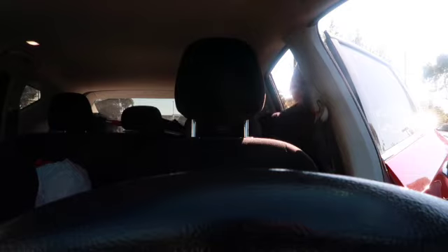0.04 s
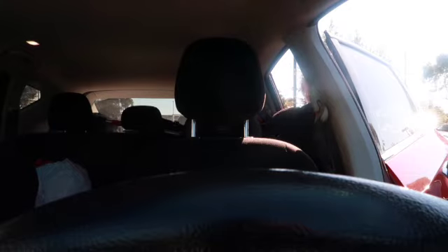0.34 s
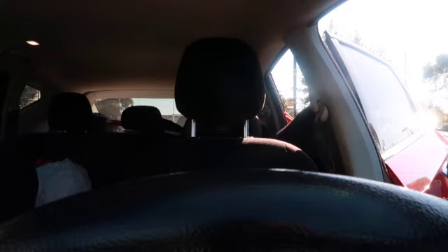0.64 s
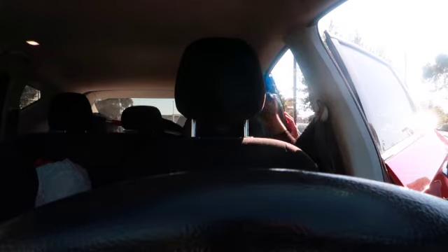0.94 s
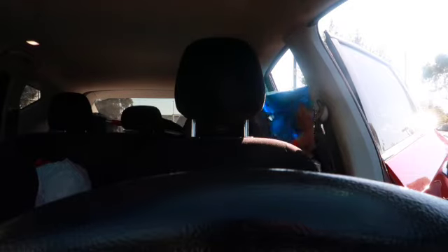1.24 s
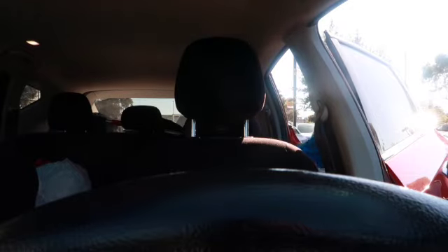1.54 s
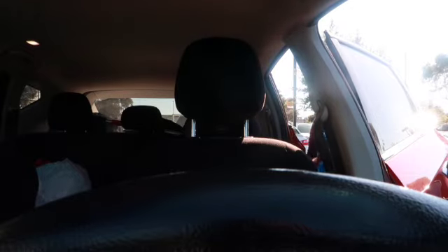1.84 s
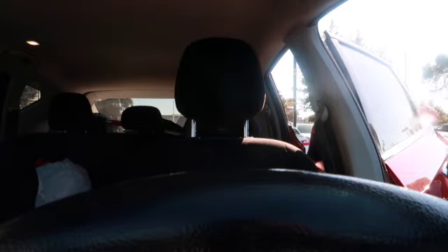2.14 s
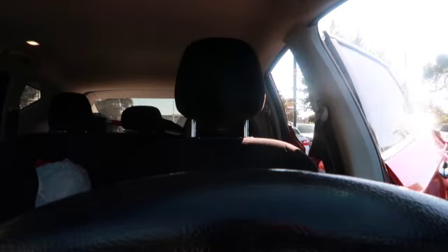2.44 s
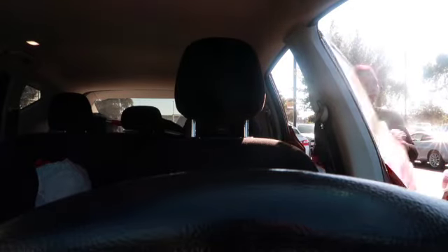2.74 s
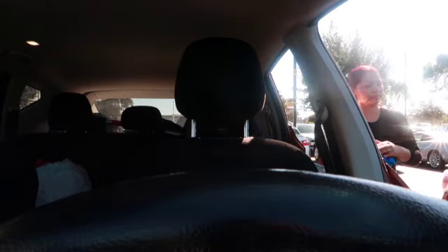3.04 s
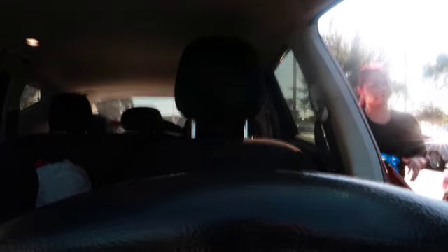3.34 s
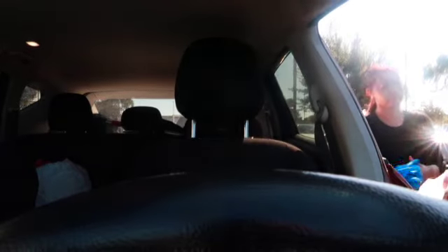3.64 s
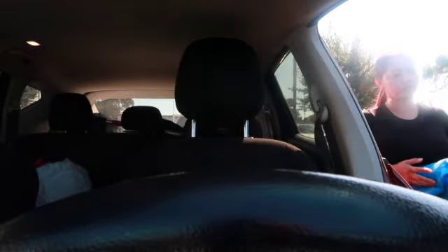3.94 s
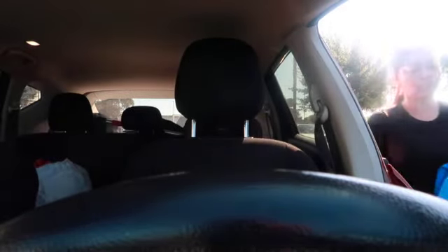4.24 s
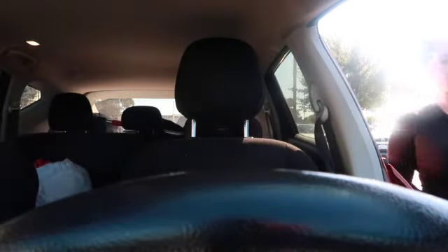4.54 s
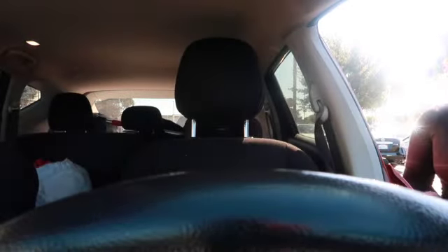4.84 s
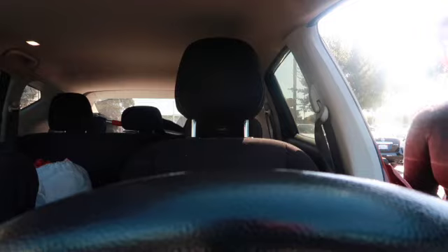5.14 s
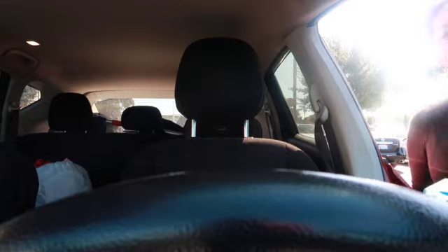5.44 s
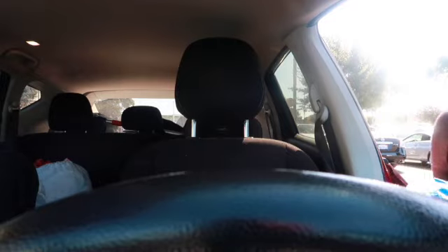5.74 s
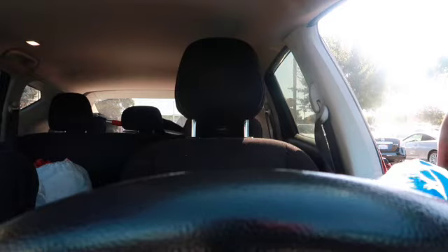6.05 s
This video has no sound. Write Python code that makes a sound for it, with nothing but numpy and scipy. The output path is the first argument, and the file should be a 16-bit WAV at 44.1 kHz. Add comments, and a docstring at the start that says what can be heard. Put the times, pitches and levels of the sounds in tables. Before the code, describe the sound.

The sound is heard from the dashboard of a parked car, with distant traffic humming through an open rear door. For the first two seconds, cloth and a bag rustle faintly, with a few soft bumps and two light knocks on plastic around 1 second. From 2 seconds, someone shuffles and thuds softly against the seat and bodywork, and a metal part of the door clicks sharply at 2.3 seconds. At 3.3 seconds the door slams, by far the loudest sound: a latch clack, a solid thump and a short boom in the cabin. The background then turns duller and quieter. From about 4 seconds to the end, small bits of metal clink lightly and clothing brushes faintly along the door. Outside, a car moves off with a muffled rumble and soft tyre noise from 4.5 seconds, its low engine note swelling and rising slightly from 5.3 to 6 seconds.

```python
"""Car door slam from inside

Parked on a car park, stereo microphone on the dashboard, a rear door open to distant traffic. Someone
rustles and bumps about at the door, its hardware clicks, then it is slammed: the latch chatters, the
panel hits the frame, the cabin booms. The recorder's gain ducks and creeps back while clothes rustle,
bits of metal clink and an engine outside begins to pull away."""
import sys
import numpy as np
from scipy import signal
from scipy.fft import rfft, irfft, next_fast_len
from scipy.io import wavfile
from scipy.ndimage import uniform_filter1d, minimum_filter1d

SR = 44100
rng = np.random.default_rng(int(sys.argv[2]) if len(sys.argv) > 2 else 0)


def to_wav(sig):
    """Store sig (one row per channel, or 1-D mono) as 16-bit WAV at the path in sys.argv[1].

    Samples outside -1..1 are clipped; the rate is SR.
    """
    pcm = np.clip(np.atleast_2d(sig), -1, 1) * 32767
    pcm = np.round(pcm).astype(np.int16)
    wavfile.write(sys.argv[1], SR, pcm.T)  # frames by channels


N = 268657
T = np.arange(N) / SR
RING_T = T[:SR]  # the second that follows a blow

# the latch rides over the striker and locks: start_s, level_db, grit_cutoff_hz
LATCH_STRIKES = [(3.2782, -21, 1200), (3.2809, -12.5, 2390), (3.284, -8, 1800), (3.2868, -18, 1800),
                 (3.2934, -5.5, 2400), (3.3002, 0, 5000), (3.3044, 0.5, 8500)]
# low rumble of the exhaust and of the shuddering body: frequency_hz, density_db
RUMBLE_SPECTRUM = [(20, -20), (45, -3), (70, 2), (95, -5.5), (140, -18), (250, -15), (400, -33.5),
                   (1000, -52), (8000, -110)]
# soft contact with seat and bodywork: frequency_hz, density_db
PADDING_SPECTRUM = [(30, -16), (70, -1.5), (115, 3.5), (250, -2.5), (380, -9.5), (550, -23), (1500, -66),
                    (8000, -110)]


def door_slam():
    """The latch chatters until the seal muffles it; the panel lands and rebounds, pumping the cabin air."""
    # ringing of latch, door skin and cabin air: pitch_hz, level_db, t60_s
    latch_modes = [(399, 2, .07), (470, -1.5, .059), (660, -6.5, 0.066), (845, -2.5, .06), (956, -0.5, .05),
                   (1042, -6.5, 0.08), (1210, -20, 0.051), (1480, -15.5, .09), (1791, -11, .1),
                   (2440, -14, .083), (2827, -20, 0.1), (4070, -29, .09), (5270, -23, 0.076)]
    skin_modes = [(229, 0.5, 0.054), (290, 3, .045), (326, -12, 0.16), (400, -3.5, .04), (551, -13, 0.058),
                  (645, -3, 0.034), (753, -29, .047)]
    cabin_modes = [(26.7, -15, 0.63), (48.7, -7.5, 0.46), (63.3, -4.5, .28), (87.2, -9.5, 0.26),
                   (116, 1, 0.23), (149.7, -11.5, 0.27), (194, -10, 0.25), (253.2, -7.5, 0.16)]
    # noise of the struck parts: frequency_hz, density_db
    latch_spectrum = [(200, -24), (400, -8), (600, -8), (950, 3), (1450, -6), (2500, -7.5), (4000, -15.5),
                      (4600, -22), (5300, -18), (7000, -24), (10300, -26), (15000, -33)]
    panel_spectrum = [(60, -17), (270, 9.5), (450, 5.5), (780, -1.5), (1300, -12), (2600, -11.5),
                      (4000, -18.5), (5300, -25), (7500, -21), (10300, -18), (12000, -25), (15000, -26)]
    fittings_spectrum = [(400, -10), (800, -10), (1700, 3), (2700, -3.5), (4000, -13), (5300, -10.5),
                         (7000, -24), (10300, -21), (15000, -31)]
    # the door touches its seal, lands and rebounds: start_s, panel_db, boom_db, clap_cutoff_hz
    landings = [(3.2935, -9, -19, 3000), (3.3008, 8, 4, 4500), (3.3321, -0.5, -9, 2500),
                (3.359, -19, -12, 2000)]
    rattles = [(3.324, -18), (3.334, -22), (3.343, -24.5), (3.381, -30), (3.387, -36), (3.413, -41)]  # loose fittings inside the door: start_s, level_db
    latch, body = np.zeros((2, 2, N))
    catch = undb(-3) * push(latch_modes)
    skin = undb(-2.5) * push(skin_modes)
    boom = contact(0.021) * push(cabin_modes)
    for s, db, cutoff_hz in LATCH_STRIKES:
        grit = undb(-4.5) * dull(crack(latch_spectrum, t60=0.054, tail_db=-16, tail_t60=0.19), cutoff_hz)
        add(latch, s, undb(db) * contact(0.0067) * (catch + grit))
    for s, panel_db, boom_db, cutoff_hz in landings:
        clap = undb(-9) * dull(crack(panel_spectrum, t60=0.018, tail_db=-8.5, tail_t60=0.3), cutoff_hz)
        panel = undb(panel_db) * contact(0.0049) * (skin + clap)
        rumble = noise(RUMBLE_SPECTRUM, size=len(RING_T), apart_db=-10)
        shudder = undb(-15.5) * contact(0.033) * fade(0.5) * rumble
        add(body, s, panel + undb(boom_db) * (boom + shudder))
    for s, db in rattles:
        rattle = crack(fittings_spectrum, t60=0.051, tail_db=-14.5, tail_t60=0.088)
        add(body, s, undb(db) * contact(0.0026) * rattle)
    seal = undb(-7.5 * rise(start_s=3.307, length_s=0.008))  # the rubber closes on the latch's ringing
    return latch * seal + body


def door_click():
    """A sprung metal part in the open door snaps over and bounces."""
    snaps = [(2.3303, -15.5), (2.3317, -19), (2.3355, -24), (2.3405, -25.5), (2.3447, -30)]  # the snap and its bounces: start_s, level_db
    snap_spectrum = [(300, -40), (850, -5.5), (1450, -2.5), (1800, -9), (2400, 10.5), (2900, -1.5),
                     (3450, 2.5), (4000, -10), (4600, -8), (6800, -17), (9800, -16), (11200, -16),
                     (12500, -23), (14500, -17), (15400, -3), (16500, -40)]  # noise of the impact: frequency_hz, density_db
    hardware_modes = [(822, -19, .34), (1194, -17, .069), (1483, -4.5, .05), (1836, -21, .19),
                      (2274, -9, 0.11), (2370, -1, 0.055), (2490, -6, .08), (2700, -10, 0.14),
                      (3310, -6, .05), (3540, -11, 0.076), (4550, -13, .05), (6265, -24, 0.06),
                      (8240, -15, 0.053), (9760, -2.5, 0.015), (10700, -9, .04)]  # ringing metal: pitch_hz, level_db, t60_s
    out = np.zeros((2, N))
    for s, db in snaps:
        snap = crack(snap_spectrum, t60=0.026, tail_db=-12, tail_t60=0.16)
        ringing = undb(-2.5) * ring(hardware_modes, scatter_db=0)
        add(out, s, undb(db) * contact(0.0015) * (snap + ringing))
    return out


def rustling():
    """At the rear door, cloth, a bag and a shuffling body slide in tiny catches."""
    # sliding movements: middle_s, level_db, width_s
    cloth_strokes = [(.26, -53.5, 0.27), (0.486, -49.5, 0.042), (0.73, -54, 0.13), (0.92, -51, 0.085),
                     (1.02, -52, 0.14), (1.16, -55, 0.082), (1.6, -55.5, 0.25), (1.774, -49.5, 0.051),
                     (3.912, -56.5, 0.14), (4.1, -49, 0.066), (4.52, -53, 0.51), (5.18, -52.5, 0.34),
                     (5.324, -46.5, 0.065), (5.544, -56, 0.095), (5.858, -52.5, 0.08), (6.053, -54, 0.22)]
    bag_swishes = [(.7, -51, 0.055), (.94, -53.5, .1), (1.04, -53, 0.06), (1.17, -55, 0.055)]  # a slick bag going past
    sleeve_brushes = [(4.87, -53.5, 0.091), (5.19, -45.5, 0.2)]  # along the outside of the door
    shuffles = [(.53, -32.5, .075), (2.06, -34.5, 0.075), (2.17, -33, 0.095), (2.67, -33, 0.13),
                (3.11, -36, 0.1), (3.2, -34, 0.042)]  # against seat and bodywork
    # friction noise of each material: frequency_hz, density_db
    cloth_spectrum = [(500, 6), (1400, -14.5), (2600, 3.5), (3800, -1.5), (5400, -6.5), (7000, -12),
                      (10200, -9.5), (11500, -21.5), (15000, -19), (17000, -30)]
    bag_spectrum = [(1000, -25), (2800, 6.5), (4000, 0), (5100, 0), (6500, -21), (10200, -29), (15000, -25)]
    sleeve_spectrum = [(400, -12), (950, -1), (1250, -1), (1500, -2), (1850, -2), (2400, -1.5), (3400, -8),
                       (4500, -17), (5300, -7), (7000, -17), (10000, -23), (13000, -45)]
    cloth_motion = np.hypot(strokes(cloth_strokes), undb(-59))  # cloth never quite rests
    cloth = noise(cloth_spectrum, apart_db=-2.5) * cloth_motion * undb(2 * walk(45) + 1.8 * walk(600))
    bag = noise(bag_spectrum, apart_db=-18) * strokes(bag_swishes) * undb(2.3 * walk(330))
    sleeve = noise(sleeve_spectrum, apart_db=-8) * strokes(sleeve_brushes) * undb(1.7 * walk(80))
    seat = noise(PADDING_SPECTRUM, apart_db=13.5) * strokes(shuffles) * undb(2.6 * walk(70))
    return cloth + bag + sleeve + seat


def knocks_and_bumps():
    """Sharp knocks on plastic trim, and padded bumps that thud through the bodywork."""
    # blows on the trim and on the padding: start_s, level_db, t60_s
    trim_knocks = [(.994, -31, 0.025), (1.197, -32.5, 0.02), (4.987, -35, 0.019)]
    soft_bumps = [(.499, -29, .25), (.525, -25, 0.11), (0.616, -28.5, 0.12), (2.11, -20.5, 0.098),
                  (2.148, -23, 0.19), (2.335, -26, 0.11), (2.514, -23, 0.19), (2.623, -21.5, 0.23),
                  (2.652, -25.5, 0.27), (2.722, -28, .1), (2.755, -21.5, 0.088), (3.072, -23.5, 0.28),
                  (3.208, -20.5, 0.11), (4.08, -31, 1), (5.35, -31, 0.45)]
    trim_spectrum = [(700, -28), (1500, -3), (2250, 3), (2700, 1), (3200, -4), (4700, -24), (9000, -37),
                     (15000, -40)]  # struck plastic: frequency_hz, density_db
    out = np.zeros((2, N))
    for s, db, t60 in trim_knocks:
        add(out, s, undb(db) * contact(0.0042) * crack(trim_spectrum, t60, tail_db=-30, tail_t60=0.1))
    for s, db, t60 in soft_bumps:
        thud = noise(PADDING_SPECTRUM, size=len(RING_T), apart_db=15.5)
        add(out, s, undb(db) * contact(0.018) * fade(t60) * thud)
    return out


def clinks():
    """A bit of metal ticks and bounces once, ringing only briefly."""
    touches = [(3.56, -54, 5000), (4.085, -42, 3500), (4.277, -36.5, 5000), (4.321, -40.5, 3500),
               (4.449, -45.5, 4960), (4.46, -49, 4500), (4.987, -42, 5900), (5.357, -36.5, 3900),
               (5.481, -49, 5100), (5.526, -42, 5020), (5.593, -51, 3970), (5.817, -46, 4040)]  # light touches: start_s, level_db, favoured_hz
    trinket_modes = [(2760, -1, 0.083), (3320, -8, .06), (3940, 1, 0.064), (4100, -5, .06),
                     (5070, -3.5, 0.073), (5300, -3, 0.059), (5950, -6, 0.065), (7300, -15, .03)]  # ringing metal: pitch_hz, level_db, t60_s
    tick_spectrum = [(500, -6), (1400, -9), (2800, 3), (5400, 5), (7500, -7), (10500, -6), (15000, -2)]  # metal meeting metal: frequency_hz, density_db
    pitch_spread, fall_db_per_octave = 0.012, 13.5  # modes weaken away from the favoured pitch
    out = np.zeros((2, N))
    for (s, db, favoured_hz), (detune, delay) in zip(touches, rng.standard_normal((len(touches), 2))):
        tuning = 1 + pitch_spread * detune
        modes = [(hz * tuning, mode_db - fall_db_per_octave * abs(np.log2(hz / favoured_hz)), t60)
                 for hz, mode_db, t60 in trinket_modes]
        bounce_s = 0.0088 * np.exp(0.34 * delay)
        for after_s, touch_db in (0, 0), (bounce_s, -1.5):
            ringing = undb(-5.5) * ring(modes, scatter_db=1)
            tick = undb(1) * crack(tick_spectrum, t60=0.015, tail_db=-15, tail_t60=0.08)
            add(out, s + after_s, undb(db + touch_db) * contact(0.0028) * (ringing + tick))
    return out


def rubs():
    """Skin and cloth stick and slip on trim, exciting one broad resonance."""
    squeaks = [(0.058, -53.5, 0.094, 2400), (0.275, -52, 0.1, 2620), (0.598, -46.5, 0.051, 2680),
               (4.95, -52.5, 0.41, 2300), (5.78, -48, 0.17, 2200)]  # faint squeaks: start_s, level_db, length_s, pitch_hz
    resonance = [(.35, -34), (.68, -6.5), (.88, -5.5), (1, -1), (1.12, -8), (1.6, -21), (2.5, -34),
                 (6, -47)]  # colour of a squeak: pitch_ratio, density_db
    out = np.zeros((2, N))
    grip = undb(2 * walk(60) + 2.1 * walk(400))
    for s, db, length_s, pitch_hz in squeaks:
        swell = np.sin(np.pi * np.clip(RING_T / length_s, 0, 1))
        spectrum = [(ratio * pitch_hz, density_db) for ratio, density_db in resonance]
        add(out, s, undb(db) * swell * noise(spectrum, size=len(RING_T), apart_db=-7))
    return out * grip


def departing_car():
    """Outside, an engine note climbs over an uneven exhaust rumble; tyres swell as the car rolls by."""
    pulls = [(3.45, 1.12, 110.9, 11, -42.5), (5.3, 0.82, 108.8, 18, -25)]  # on the throttle: start_s, length_s, firing_hz, climb_hz_per_s, level_db
    engine_orders = [(1, -18), (2, -14), (3, 0), (5, -32), (6, -24)]  # partials of the note: shaft_multiple, level_db
    tyre_spectrum = [(250, -16), (500, 2.5), (1000, 5), (1500, -8), (2100, -7.5), (3000, -18),
                     (6000, -39.5), (10000, -45), (13000, -94)]  # rolling noise: frequency_hz, density_db
    throttle_s, release_s, firings_per_turn = 0.26, 0.3, 3
    nearest_s, half_power_s = 4.76, 0.86  # the tyres are 3 dB down this long either side of nearest
    tone = 0
    for s, length_s, firing_hz, climb, level_db in pulls:
        shaft_hz = (firing_hz + climb * (T - s)) / firings_per_turn
        angle = 2 * np.pi * np.cumsum(shaft_hz * (1 + 0.0057 * walk(20))) / SR
        effort = rise(s, throttle_s) * (1 - rise(s + length_s - release_s / 2, release_s))
        note = sum(undb(db + walk(12)) * np.sin(order * angle) for order, db in engine_orders)
        tone += undb(level_db) * effort * note
    moving_off = rise(start_s=4.52, length_s=0.28)
    exhaust = noise(RUMBLE_SPECTRUM, apart_db=15.5) * moving_off * undb(-34 + 2 * walk(11))
    distance = np.hypot(1, (T - nearest_s) / half_power_s)  # 1 when nearest
    tyres = noise(tyre_spectrum, apart_db=-2) * undb(-45.5) / distance
    return np.sqrt(2) * tone + exhaust + tyres


def car_park():
    """Distant traffic through the open door gives way to the duller air of the shut cabin."""
    # ambience with the door open and shut: frequency_hz, density_db
    open_spectrum = [(13, -42), (22, -14), (36, -7), (59, -0.5), (118, 1), (137, -9), (200, -1), (276, -6),
                     (339, -13.5), (837, -12), (1060, -12), (1400, -22), (1660, -17.5), (2070, -27.5),
                     (3740, -37), (10300, -55.5), (11500, -53), (15000, -57)]
    shut_spectrum = [(13, -67), (22, -29), (53, -1.5), (124, -3.5), (197, -7.5), (224, -13), (262, -9.5),
                     (487, -23.5), (554, -20.5), (904, -23), (1400, -31.5), (1600, -25.5), (2120, -41),
                     (5230, -49.5), (10300, -56), (11500, -59), (15000, -56)]
    shut = np.clip((T - LATCH_STRIKES[0][0]) / 0.025, 0, 1)
    outside = noise(open_spectrum, apart_db=-3) * undb(-36.5 + 0.5 * walk(4.9))
    inside = noise(shut_spectrum, apart_db=2.5) * undb(-36 + 0.5 * walk(6.6))
    return (1 - shut) * outside + shut * inside


def undb(db):
    """Decibels to gain."""
    return 10 ** (np.asarray(db) / 20)


def walk(rate_hz):
    """Smooth random wander around zero."""
    hold = max(int(SR / rate_hz), 1)
    steps = np.repeat(rng.standard_normal(N // hold + 1), hold)
    return 1.07 * uniform_filter1d(uniform_filter1d(steps, hold), hold)[:N]


def ports(size):
    """The two microphone ports agree in the bass and nearly oppose each other in the top treble."""
    left_lag = [(2500, 0), (4000, .08), (6500, .36), (9000, .66), (10800, .82), (11800, .92)]  # left port behind the right: frequency_hz, lag_half_cycles
    unshared = [(50, -47), (130, -41), (280, -19), (1000, -15), (2200, -9.5), (4100, -2), (5500, 1.5),
                (6740, -2.5), (8880, -11), (10400, -17), (12000, -31), (15500, -25)]  # sound the ports do not share: frequency_hz, level_db
    bins = np.fft.rfftfreq(size, 1 / SR)
    lag_rad = np.pi * np.interp(bins, *np.transpose(left_lag))
    side_gain = undb(np.interp(bins, *np.transpose(unshared)))
    return lag_rad, side_gain


def noise(spectrum, size=N, apart_db=0):
    """Coloured stereo noise with a mid of rms 1; diffuse sound differs more between the ports."""
    hz, db = np.transpose(spectrum)
    gain = undb(np.interp(np.log(np.fft.rfftfreq(size, 1 / SR) + 1), np.log(hz), db))
    mid, side = gain * np.exp(2j * np.pi * rng.random((2, len(gain))))
    _, side_gain = ports(size)
    mid, side = irfft(mid, size), irfft(side * side_gain, size)
    return (mid + undb(apart_db) * side * np.array([[1], [-1]])) / np.std(mid)


def fade(t60):
    """Free decay after a blow."""
    return np.exp(-np.log(1000) * RING_T / max(t60, 0.002))


def contact(t60):
    """A blow builds up over its contact time; softer is slower."""
    return (1 - fade(t60)) ** 2


def ring(modes, scatter_db):
    """Damped modes set going by one blow, with random phases and levels spread by scatter_db."""
    phases = 2 * np.pi * rng.random(len(modes))
    offsets_db = scatter_db * rng.standard_normal(len(modes))
    return sum(undb(db + offset_db) * fade(t60) * np.sin(2 * np.pi * hz * RING_T + phase)
               for (hz, db, t60), phase, offset_db in zip(modes, phases, offsets_db))


def push(modes):
    """A broad surface pushed as a whole starts all its modes together."""
    return sum(undb(db) * fade(t60) * np.sin(2 * np.pi * hz * RING_T) for hz, db, t60 in modes)


def crack(spectrum, t60, tail_db, tail_t60):
    """Dense short-lived resonances of a struck part, and their duller echo in the upholstered cabin."""
    burst = noise(spectrum, size=len(RING_T), apart_db=-6.5)
    return burst * fade(t60) + undb(tail_db) * dull(burst, hz=6500) * fade(tail_t60)


def dull(x, hz):
    """Gently takes off the treble above a frequency."""
    return signal.lfilter(*signal.butter(1, min(hz, 0.45 * SR), fs=SR), x)


def rise(start_s, length_s):
    """A smooth step from 0 to 1."""
    return np.sin(np.pi / 2 * np.clip((T - start_s) / length_s, 0, 1)) ** 2


def strokes(table):
    """Loudness of sliding contact: each stroke speeds up and slows down in a bell shape."""
    return np.sqrt(sum(undb(db) ** 2 * np.exp(-np.log(2) * (2 * (T - middle_s) / width_s) ** 2)
                       for middle_s, db, width_s in table))


def add(out, start_s, sound):
    """Mix a one-second sound in at a time."""
    i = int(start_s * SR)
    out[:, i:i + len(RING_T)] += sound[..., :N - i]


def gain_control(x, limit_db, recover_db_per_s, window_s, attack_s):
    """Whatever exceeds the limit turns the gain down quickly; it then creeps back at a steady rate."""
    power = uniform_filter1d(np.mean(x ** 2, axis=0), int(window_s * SR))
    excess_db = np.maximum(10 * np.log10(np.abs(power) + 1e-12) - limit_db, 0)
    recovery_db = recover_db_per_s * T
    cut_db = np.maximum.accumulate(excess_db + recovery_db) - recovery_db
    return x * undb(-uniform_filter1d(cut_db, int(attack_s * SR)))


def limiter(x, ceiling, window_s):
    """Eases the gain down around any peak that would overload."""
    width = int(window_s * SR)
    gain = np.minimum(1, ceiling / (np.abs(x).max(axis=0) + 1e-9))
    held = minimum_filter1d(gain, 2 * width)
    return x * uniform_filter1d(uniform_filter1d(held, width), width)


def scene():
    """Everything as it reaches the dashboard; the left port hears the treble just after the right."""
    background = car_park() + departing_car()
    person = rustling() + knocks_and_bumps() + rubs() + clinks()
    left, right = background + person + door_click() + door_slam()
    lag_rad, _ = ports(N)
    return np.array([irfft(rfft(left) * np.exp(-1j * lag_rad), N), right])


def record(dry):
    """Microphone colour, automatic gain, a peak limiter and a steep cut above 15.7 kHz."""
    port_resonance = [(8500, 0), (11200, 0.5), (12500, 7.5), (14200, -2), (15200, -9)]  # a peak in the top treble: frequency_hz, gain_db
    size = next_fast_len(N)
    colour = undb(np.interp(np.fft.rfftfreq(size, 1 / SR), *np.transpose(port_resonance)))
    heard = irfft(rfft(dry, size) * colour, size)[:, :N]
    ducked = gain_control(heard, limit_db=-8.5, recover_db_per_s=5.5, window_s=0.022, attack_s=0.0068)
    limited = limiter(ducked, ceiling=0.96, window_s=0.0005)
    return signal.sosfilt(signal.ellip(8, 0.2, 70, 15700, fs=SR, output="sos"), limited)


dry = scene()
out = record(dry)
to_wav(out)
```